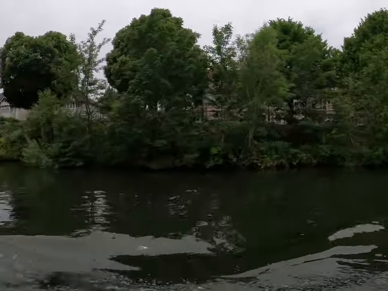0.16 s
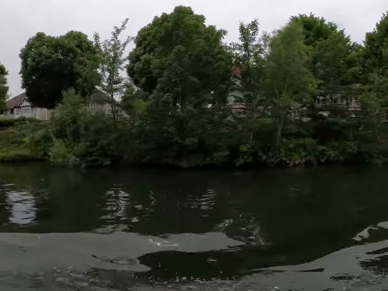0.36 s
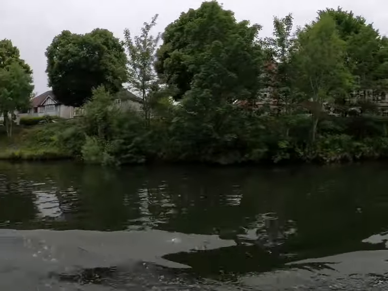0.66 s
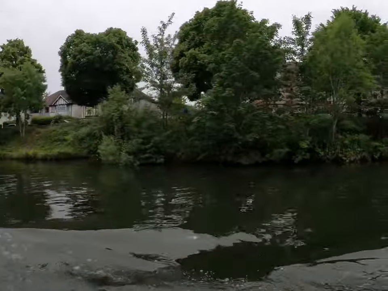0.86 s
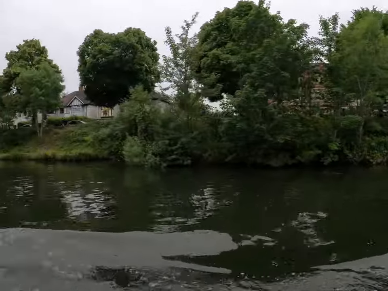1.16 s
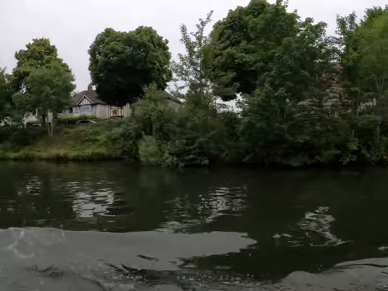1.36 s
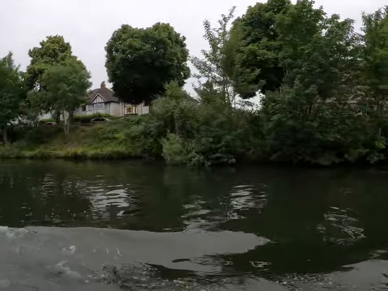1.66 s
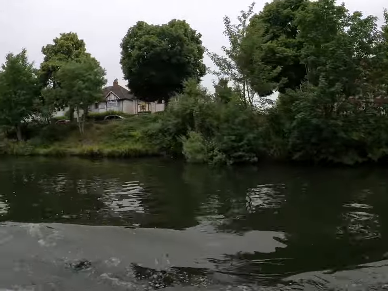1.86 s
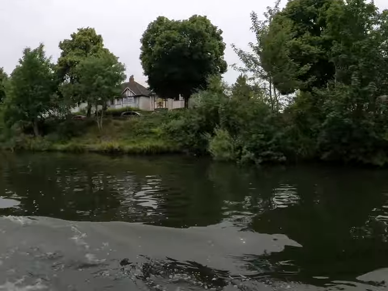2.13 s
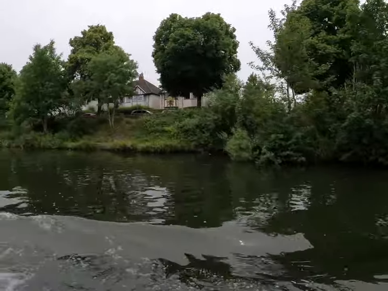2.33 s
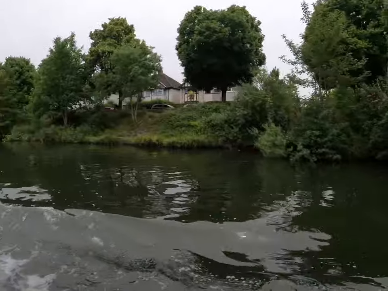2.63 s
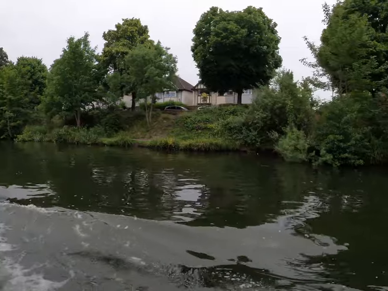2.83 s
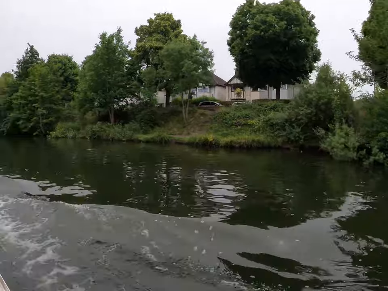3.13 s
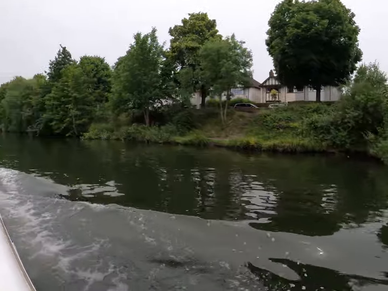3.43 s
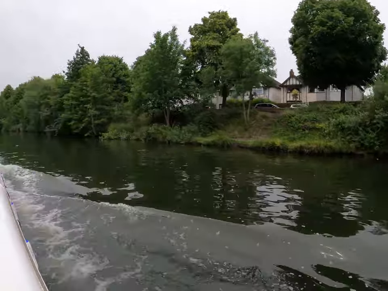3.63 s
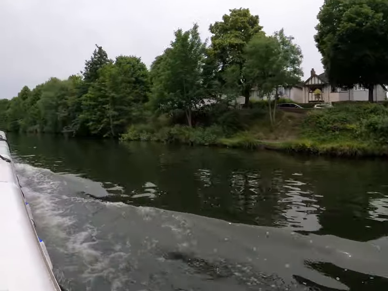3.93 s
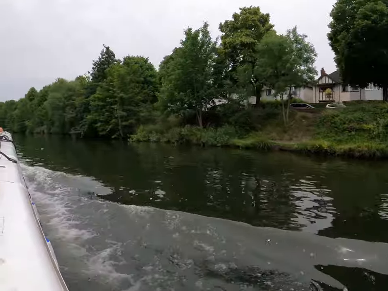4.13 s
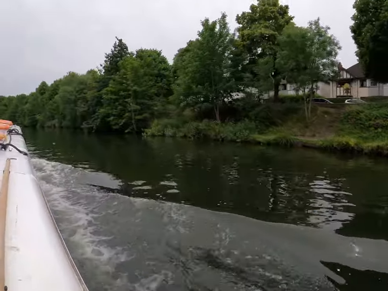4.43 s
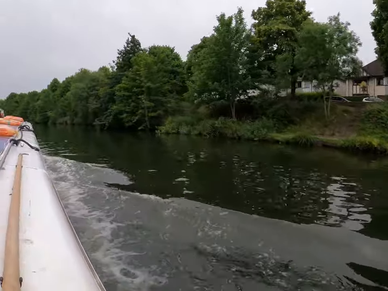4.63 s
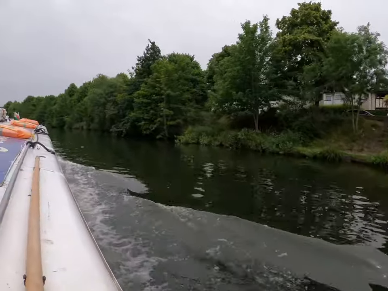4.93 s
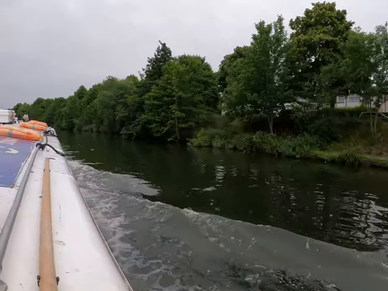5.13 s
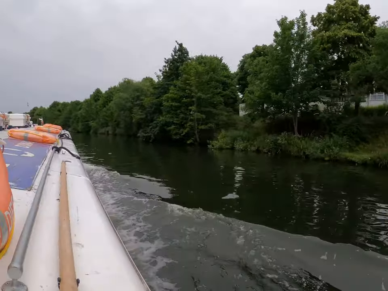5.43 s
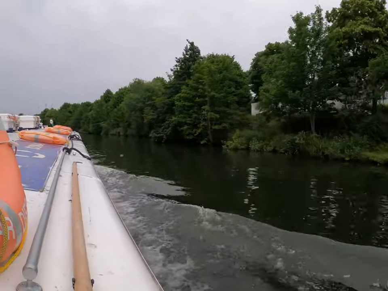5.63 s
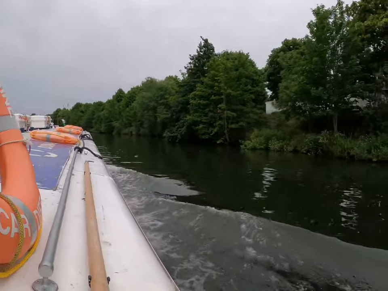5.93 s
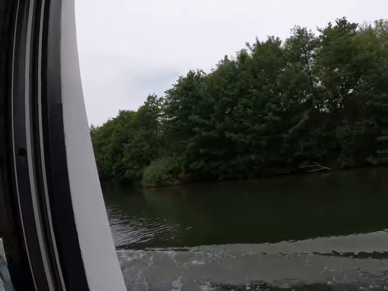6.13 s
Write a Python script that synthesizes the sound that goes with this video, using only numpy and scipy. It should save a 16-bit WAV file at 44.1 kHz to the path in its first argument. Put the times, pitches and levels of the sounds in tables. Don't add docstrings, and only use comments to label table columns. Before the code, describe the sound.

A deep, unwavering boat engine drone dominates, its low tone briefly dipping under wind thuds. Behind it runs a quieter wash of foaming water, with small gurgles and fine spray. Gusts flutter and pop close on a hand-held outdoor microphone early on, then ease. Tiny droplet ticks appear, and thin gear whine shifts in colour as the microphone turns. The sound ends abruptly.

```python
import sys
import numpy as np
from scipy import signal
from scipy.io import wavfile
from scipy.ndimage import uniform_filter1d, minimum_filter1d

SR = 44100
rng = np.random.default_rng(int(sys.argv[2]) if len(sys.argv) > 2 else 0)


def wav_out(sig):
    wavfile.write(sys.argv[1], SR, np.round(np.clip(np.atleast_2d(sig).T, -1, 1) * 32767).astype(np.int16))


def field_ratio(decibels):
    return 10 ** (np.asarray(decibels, dtype=float) / 20)


N = 276990
SECONDS = np.arange(N) / SR
CYCLE_HZ = 16.8647
FIRST_TURN = -.222
PUMP_STROKES, GEAR_TEETH = 46, 14

# (t/s, level/dB)
HISS = [(0, -93), (1.4, -95.5), (2.3, -92.5), (2.79, -86.5), (3.3, -91.5), (3.55, -85), (4.85, -83.5),
        (5.0, -87), (6.05, -87)]
# (t/s, level/dB, length/s)
TICKS = [(0.0944, -51.5, 0.003), (0.1094, -46, 0.003), (0.1524, -55, 0.0022), (0.1574, -51, 0.0027),
         (0.1744, -61, 0.0026), (0.1794, -54, 0.003), (3.2096, -55.5, 0.0034), (3.3314, -56, 0.003),
         (3.5533, -48, 0.0023), (4.4094, -48, 0.00306), (4.8694, -50, 0.0038), (4.8894, -52.5, 0.0033),
         (4.9194, -49, 0.0034), (5.0894, -51.5, 0.003), (5.9324, -44, 0.0025)]
# (t/s, level/dB)
GUST = [(0, -24.5), (.13, -20), (.38, -27), (.45, -30), (.73, -27.5), (.97, -23.5), (1.14, -28.5),
        (1.24, -38.5), (1.44, -31.5), (1.82, -32.5), (2.35, -30.5), (2.64, -33), (2.96, -30), (3.2, -33.5),
        (3.91, -33), (4.5, -39), (4.93, -32.5), (5.05, -35)]
# (f/Hz, level/dB per Hz)
WIND = [(70, -8.5), (100, 4), (140, -3.5), (200, -8), (300, -7.5), (450, -17)]
# (t/s, level/dB, length/s)
SHOVES = [(.13, -33, .08), (.64, -28, .05), (.76, -31, .05), (1.12, -28, .08), (1.38, -28, 0.066),
          (1.8, -32, .08), (2.17, -32, 0.069), (2.66, -34, .06), (3.1, -34, 0.092), (3.9, -32.5, .06),
          (4.354, -21, .06), (4.745, -27, .05), (4.9, -26, 0.092), (5.4, -31, .08), (5.68, -28, .05),
          (5.93, -33, 0.054)]
# (t/s, body level/dB, edge level/dB, length/s)
PUFFS = [(0.122, -23, -31.5, 0.11), (0.195, -25, -30.5, 0.066), (0.25, -20, -32, 0.047),
         (0.284, -17, -25.5, 0.044), (0.35, -44, -31.5, 0.069), (0.432, -21.5, -37, 0.0074),
         (0.464, -28, -33, 0.017), (0.652, -13.5, -41, 0.018), (0.72, -16, -23.5, 0.023),
         (0.779, -22, -30, 0.023), (0.833, -19, -30.5, 0.06), (0.906, -16, -32, 0.014),
         (0.923, -16.5, -23.5, 0.016), (0.95, -36, -25, 0.015), (0.988, -20.5, -27, 0.037),
         (1.017, -25, -35.5, 0.015), (1.089, -30, -43, 0.014), (1.1, -26, -48, 0.016),
         (1.143, -23, -45.5, 0.024), (1.201, -20, -28, 0.023), (1.351, -22.5, -28, 0.033),
         (1.785, -19.5, -40, 0.021), (1.83, -32, -33, 0.031), (2.142, -28, -40, 0.0082),
         (2.33, -25, -37, 0.027), (4.077, -34, -50, 0.024), (4.342, -41, -54.5, 0.028),
         (4.866, -31, -35, 0.017), (4.926, -25.5, -36.5, 0.089)]
# (t/s, peak level/dB)
SNAPS = [(0.239, -19), (0.288, -17), (0.644, -22.5), (0.718, -21), (0.781, -19), (0.81, -19.5),
         (0.896, -22), (0.924, -17.5), (0.984, -23.5), (1.0, -24), (1.201, -21), (1.336, -26), (1.781, -21),
         (2.236, -24), (2.319, -25), (5.499, -23), (5.972, -24)]
# (t/s, depth/dB, length/s)
DUCKS = [(0.12, -1, 0.015), (0.188, 8, 0.013), (0.23, 9, 0.011), (0.374, 5, 0.013), (0.65, 15, 0.018),
         (0.788, 5, 0.028), (0.953, 7, 0.0084), (0.972, 23, 0.0099), (1.079, 24, 0.011), (1.122, 19, 0.029),
         (1.18, 3, 0.0097), (1.224, 22, 0.013), (1.388, 4, 0.016), (1.525, 5.5, 0.014), (1.666, 2, 0.036),
         (1.781, 8, 0.0092), (1.842, 26, 0.0069), (1.98, 0, 0.014), (2.13, 7, 0.011), (2.185, 5, 0.017),
         (3.407, 2, 0.016), (3.882, 9, 0.014), (3.966, 2, 0.027), (4.19, 4.5, 0.024), (4.286, 7, 0.012),
         (4.374, 5, 0.017), (4.75, 12, 0.014), (4.921, 8, 0.017), (5.39, 4.5, 0.014), (5.672, 9.5, 0.013)]
# (t/s, f/Hz, level/dB, length/s)
GURGLES = [
    (0.526, 2300, -53, .04),
    (.56, 1253, -42.5, 0.097),
    (0.656, 3050, -50, 0.044),
    (0.665, 2600, -50, 0.022),
    (0.692, 1710, -50, .02),
    (1.656, 1462, -42, 0.037),
    (5.492, 2800, -51, .008),
    (5.55, 1450, -44, 0.014),
    (5.58, 1195, -45, .012),
    (5.598, 3300, -50.5, .01),
]
# (t/s, level/dB)
FLOW = [(0, -48.5), (.15, -41.5), (.48, -45), (.69, -40), (.76, -44.5), (.82, -43), (1.5, -45.5),
        (1.62, -42.5), (2.77, -42), (3.64, -48), (4.82, -48), (4.94, -42), (5.37, -44.5), (5.59, -43),
        (5.65, -46.5), (6.05, -46.5)]
# (f/Hz, level/dB per Hz)
ROAR = [(150, -2), (240, -2.5), (340, -2.5), (480, -10.5), (600, -12), (760, -10), (950, -13),
        (1200, -20.5)]
# (f/Hz, level/dB per Hz)
RUSH = [(700, -5), (960, 3), (1360, -2), (1900, -7), (2500, -7), (3200, -12.5), (4200, -20), (5400, -27)]
# (f/Hz, level/dB per Hz)
SPRAY = [(2800, -11.5), (3800, 0), (5400, -5.5), (7200, -9.5), (8600, -10), (9600, -22), (10500, -27.5),
         (11800, -39.5), (13000, -54)]
# (t/s, firing tone level/dB, share facing the gearbox/0-1)
TURN = [
    (0, -16, 0.2),
    (.9, -16, 0),
    (1.3, -15.5, 0.42),
    (2.3, -15, 0.11),
    (3.1, -14, 0),
    (4.0, -14, 0.06),
    (4.2, -13.5, 0.37),
    (4.78, -14, 0.5),
    (5.0, -14.5, 0.93),
    (6.05, -13.5, 1),
]
# (multiple of cycle, level/dB)
ORDER_LEVELS = [(7, -38.5), (8, -28.5), (11, -50.5), (12, -37.5), (13, -45.5), (15, -44), (17, -52),
                (18, -55.5), (19, -52.5), (20, -55.5), (22, -56), (23, -52.5), (24, -55.5), (26, -47.5),
                (27, -47.5), (31, -55.5), (36, -62.0), (39, -63), (45, -56), (46, -46.5), (51, -56.5),
                (53, -55.5), (55, -60), (57, -57), (60, -68), (65, -64), (77, -66)]
# (mesh multiple, level facing away/dB, change on facing/dB, share of flow swing)
MESH = [(1, -35, -7.5, 0.15), (2, -43.5, 7, 0.43), (3, -47.5, -5, .1), (4, -58, 10.5, 0.94),
        (5, -61.5, 7, .5)]
# (mesh multiple, level/dB)
HIGH_WHINE = [(6, -63), (7, -64.5), (9, -69), (10, -75.5)]


def in_time(rows):
    s, *columns = np.transpose(rows)
    return [np.interp(SECONDS, s, c) for c in columns]


def rms_one(x):
    return x / np.sqrt(np.mean(x ** 2) + 1e-20)


def evened(x, seconds):
    return x / np.sqrt(uniform_filter1d(x ** 2, int(seconds * SR)) + 0.16 * np.mean(x ** 2))


def drift(rate_hz):
    r = np.exp(-80 * np.pi * rate_hz / SR)
    white = rng.standard_normal(N // 40 + 2002)
    slow = signal.lfilter([1], [1, -2 * r, r * r], white)[2000:]
    return np.interp(np.arange(N) / 40, np.arange(len(slow)), rms_one(slow))


def band(x, low_hz, high_hz):
    return signal.sosfilt(signal.butter(2, [low_hz, high_hz], "band", fs=SR, output="sos"), x)


def coloured(spectrum, patchy_db, shared_db):
    hz, db = np.transpose(spectrum)
    edges_hz = hz[0] * 2 ** np.arange(-1 / 6, np.log2(hz[-1] / hz[0]) + .3, 1 / 3)
    white = rng.standard_normal((2, N))
    surge = drift(4.3)
    out = np.zeros(N)
    for k, (low, high) in enumerate(zip(edges_hz, edges_hz[1:])):
        level_db = np.interp(np.log(low * high) / 2, np.log(hz), db)
        level_db = level_db + patchy_db * drift(8.7) + shared_db * surge
        out += field_ratio(level_db) * band(white[k % 2], low, high)
    return rms_one(out)


def bumps(times_s, heights, lengths_s):
    out = np.zeros(N)
    for s, height, length in zip(times_s, heights, lengths_s):
        near = slice(max(int((s - .2) * SR), 0), int((s + .2) * SR))
        out[near] += height * 2 ** (-(2 * (SECONDS[near] - s) / length) ** 2)
    return out


def tone(multiple, level_db, turn_rad, wobble_db=0.):
    cycle_rad = 2 * np.pi * (CYCLE_HZ * SECONDS + FIRST_TURN / 4)
    return np.sqrt(2) * field_ratio(level_db + wobble_db) * np.sin(multiple * cycle_rad + turn_rad)


def air():
    s, db, _ = np.transpose(TICKS)
    spatter_db, spatter_s = -29.5, .02
    level = field_ratio(in_time(HISS)[0]) + bumps(s, field_ratio(db + spatter_db), np.full(len(s), spatter_s))
    return level * rms_one(band(band(rng.standard_normal(N), 10600, 15000), 9500, 17000))


def droplets():
    s, db, length = np.transpose(TICKS)
    ticking = rms_one(band(band(rng.standard_normal(N), 5000, 9200), 3500, 13000))
    return bumps(s + length / 2, field_ratio(db - 9), length) * ticking


def wind():
    rumble_db, rumble_follows, edge_mean_db, edge_follows = -34.5, 0.36, -43.5, .5
    steady_db, = in_time(GUST)
    swing_db = steady_db - steady_db.mean()

    at, shove_db, span = np.transpose(SHOVES)
    rumble_level = field_ratio(rumble_db + rumble_follows * swing_db + 1.7 * drift(7))
    rumble_level = rumble_level + bumps(at, field_ratio(shove_db), span)
    rumble = rumble_level * evened(band(rng.standard_normal(N), 25, 56), 0.09)
    steady = field_ratio(steady_db + 0.5) * coloured(WIND, patchy_db=0.2, shared_db=0.5)

    s, body_db, edge_db, length = np.transpose(PUFFS)
    eddies = rng.standard_normal((2, N))
    body = evened(band(band(eddies[0], 81, 300), 85, 600), 0.019)
    edge = evened(band(band(eddies[1], 310, 753), 200, 1200), 0.013)
    body_level = bumps(s, field_ratio(body_db), 0.89 * length)
    hiss_db = edge_mean_db + edge_follows * swing_db
    edge_level = bumps(s, field_ratio(edge_db), 0.48 * length) + field_ratio(hiss_db + 1.0 + 1.0 * drift(28))
    return rumble + steady + body_level * body + edge_level * edge


def snaps():
    s, db = np.transpose(SNAPS)
    steps = np.full(N, 1e-18)
    steps[(s * SR).astype(int)] = field_ratio(db + 27) * rng.choice([-1, 1], len(s))
    return band(band(steps, 330, 1150), 200, 1700)


def thuds():
    s, depth_db, length = np.transpose(DUCKS)
    push = evened(band(band(rng.standard_normal(N), 80, 140), 70, 190), 0.02)
    return bumps(s, field_ratio(-21.5) * np.clip(depth_db, 0, 12) / 10, 2.8 * length) * push


def gurgles():
    out = np.zeros(N)
    for s, hz, db, length in GURGLES:
        ring = np.sin(2 * np.pi * hz * SECONDS + 2.2 * drift(90))
        out += bumps([s], [field_ratio(db + 3)], [length]) * ring
    return out


def bubbles(per_s, cycles):
    sizes = field_ratio(3.5 * np.minimum(rng.exponential(1, N), 4)) * rng.choice([-1, 1], N)
    born = rng.random(N) < per_s * field_ratio(4 * drift(5)) / SR
    dealt = rng.integers(0, 16, N)
    out = np.zeros(N)
    for k, hz in enumerate(np.geomspace(900, 4500, 16)):
        r = field_ratio(-60 * hz / cycles / SR)
        w = 2 * np.pi * hz / SR
        hits = sizes * born * (dealt == k) + 1e-18
        out += 900 / hz * signal.lfilter([0, np.sin(w)], [1, -2 * r * np.cos(w), r * r], hits)
    return rms_one(out)


def water(rush_db, spray_db):
    roar = field_ratio(-39.5) * coloured(ROAR, patchy_db=0.0, shared_db=2.1)
    rush = coloured(RUSH, patchy_db=0.83, shared_db=-0.6) + field_ratio(-8) * bubbles(per_s=500, cycles=57)
    spray = coloured(SPRAY, patchy_db=1.4, shared_db=-0.2)
    wash = roar + field_ratio(rush_db - 0.17) * rush + field_ratio(spray_db) * spray
    return signal.sosfilt(signal.butter(4, 12500, fs=SR, output="sos"), wash)


def machinery(facing, swing_db):
    pump_db = -48 + 0.9 * swing_db
    out = tone(PUMP_STROKES, pump_db, .4 * drift(5.5), 2.3 * drift(12))
    for k, db in ORDER_LEVELS:
        if k not in (8, 12, PUMP_STROKES):
            out += tone(k, db, rng.uniform(0, 7) + .3 * drift(1.5), 2.0 * drift(1.2))

    mesh = [(k, db + turn_db * facing + share * swing_db) for k, db, turn_db, share in MESH]
    for k, db in mesh + HIGH_WHINE:
        waver = (min(round(k), 4) / 4) ** 2
        turn_rad = rng.uniform(0, 7) + .35 * waver * drift(4)
        wobble_db = 2.5 * waver * drift(7) + 1.2 * drift(1.5)
        out += tone(round(k) * GEAR_TEETH, db, turn_rad, wobble_db)
    return out


def firing(hum_db, second_db, facing):
    out = tone(4, hum_db, 0.032 * drift(8), 0.23 * drift(4.3))
    out -= tone(8, second_db, .1 * drift(6), .8 * drift(7))
    third_db = dict(ORDER_LEVELS)[12] - 4.5 * facing
    return out + tone(12, third_db, .2 * drift(3.9), 1.9 * drift(2.1))


def scene():
    hum_db, facing = in_time(TURN)
    flow_db, = in_time(FLOW)
    swing_db = flow_db - flow_db.mean()
    spray_db = -59.5 + 0.67 * swing_db + 0.25 * SECONDS
    ducked = field_ratio(-bumps(*np.transpose(DUCKS)))
    mix = air() + droplets() + wind() + snaps() + thuds()
    mix += gurgles() + water(flow_db, spray_db)
    mix += machinery(facing, swing_db)
    mix += ducked * firing(hum_db, -28.5, facing)
    return mix[None]


def top_cut(x):
    return signal.sosfilt(signal.butter(12, 15710, fs=SR, output="sos"), x)


def record(dry):
    cut_s = 6.058
    over_db = np.maximum(20 * np.log10(np.abs(dry[0]) + 1e-9) + 7.5, 0)
    gain_db = uniform_filter1d(minimum_filter1d(-.55 * over_db, size=400), size=400)
    held = dry * field_ratio(gain_db) * (SECONDS < cut_s)
    return top_cut(held)


dry = scene()
out = record(dry)
wav_out(out)
```